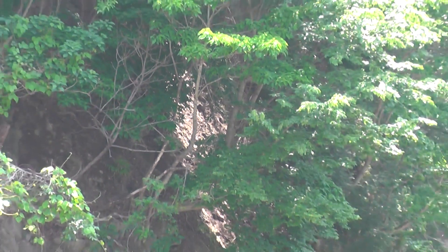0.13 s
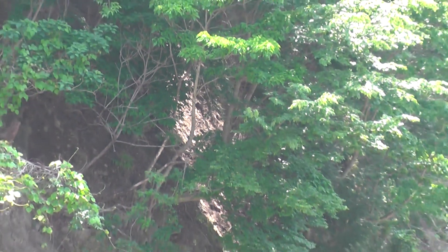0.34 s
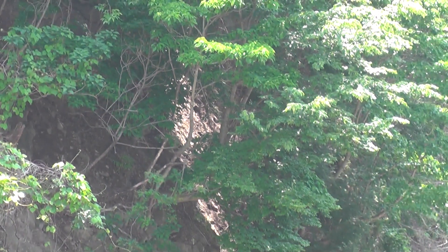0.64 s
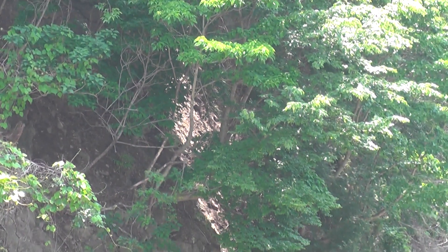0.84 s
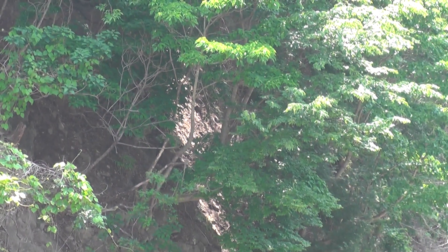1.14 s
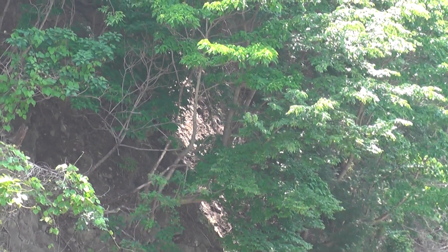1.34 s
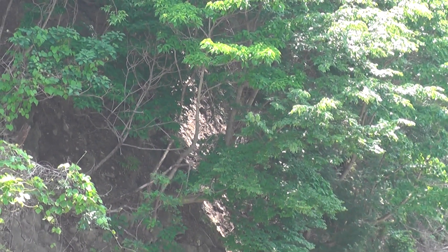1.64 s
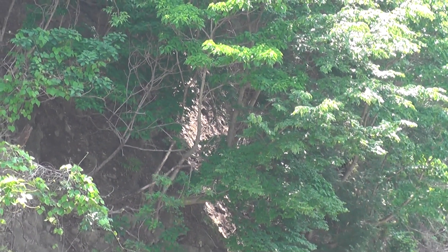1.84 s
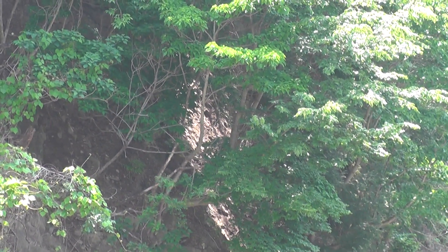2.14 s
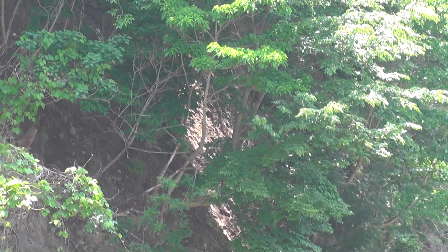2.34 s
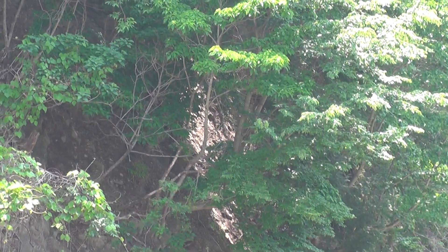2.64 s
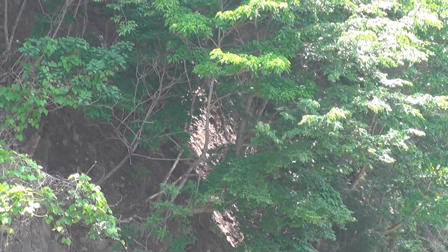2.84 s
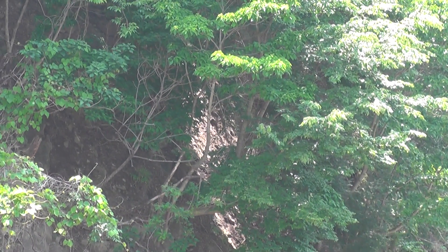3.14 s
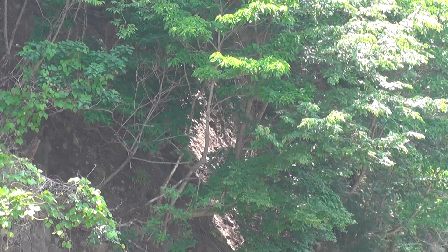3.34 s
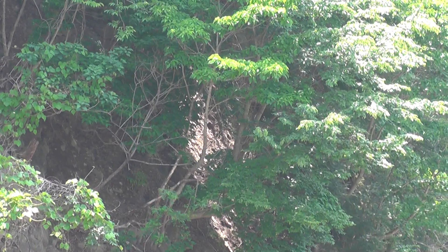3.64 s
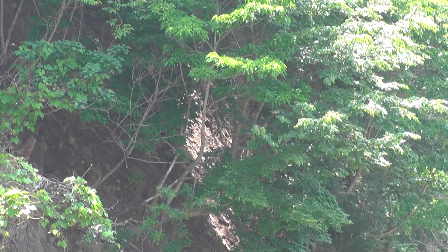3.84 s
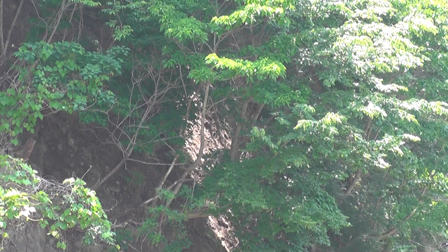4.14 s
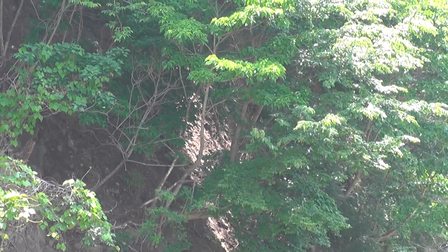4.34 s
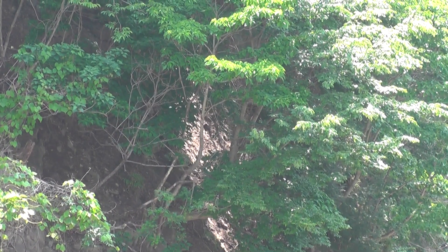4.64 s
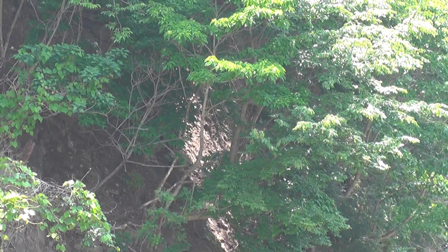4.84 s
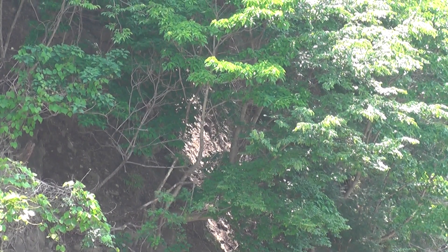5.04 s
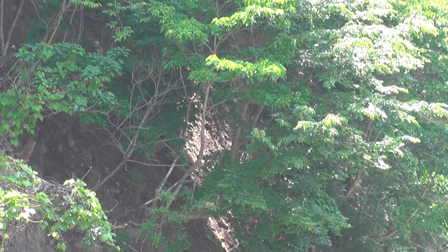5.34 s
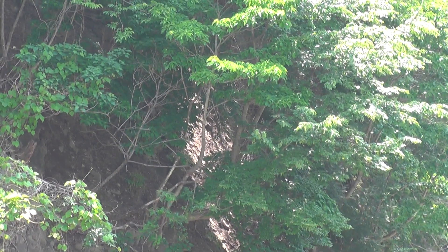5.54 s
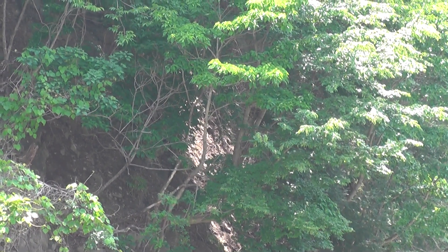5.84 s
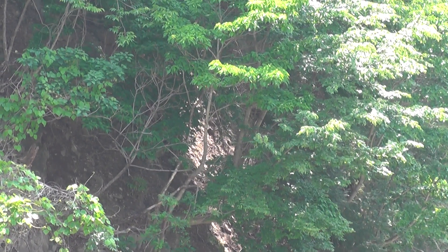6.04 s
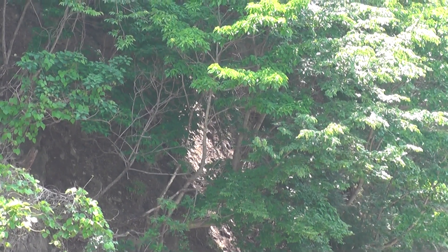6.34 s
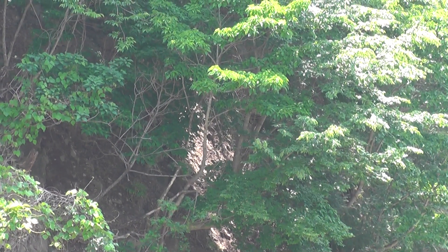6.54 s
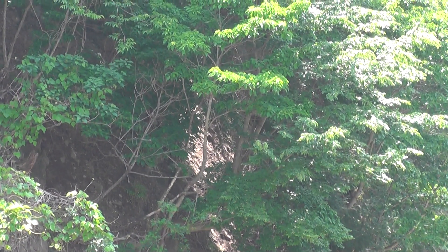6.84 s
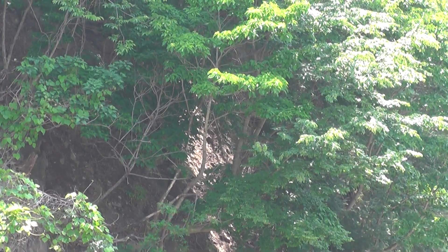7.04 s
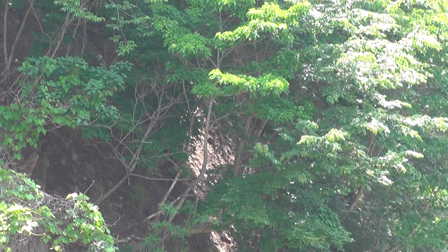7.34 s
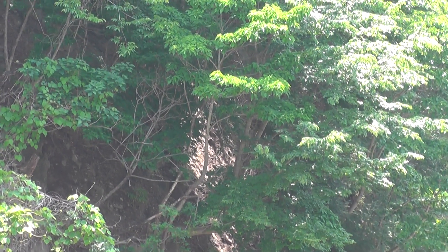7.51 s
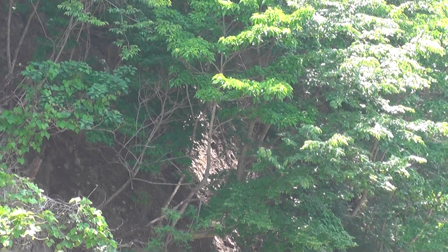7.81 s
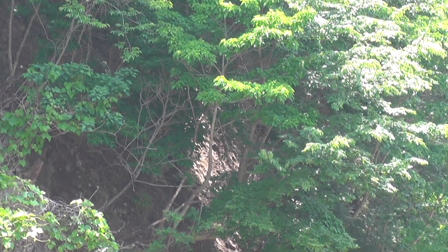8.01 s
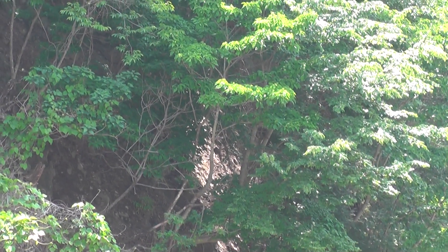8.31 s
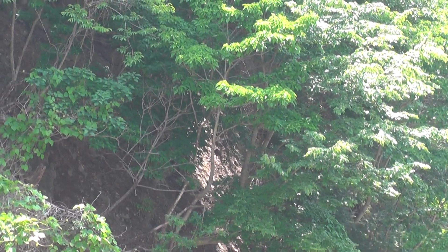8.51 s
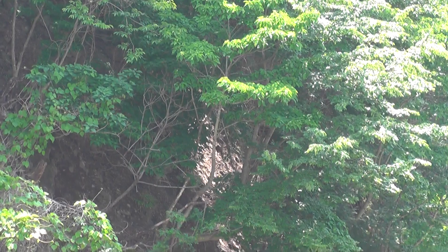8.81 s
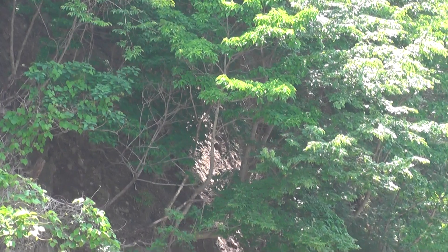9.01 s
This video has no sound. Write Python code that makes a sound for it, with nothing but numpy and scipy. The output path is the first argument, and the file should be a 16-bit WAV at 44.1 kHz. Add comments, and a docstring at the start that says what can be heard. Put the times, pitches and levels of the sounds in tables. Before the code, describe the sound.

In a wooded valley, a songbird slightly to the left sings a quick phrase of clear, high, sliding notes, then repeats it about six seconds later, echoing lightly in the trees. Far birds whistle and chirp, and one keeps giving a soft, hoarse chuck. A camera motor ticks faintly for the first second. A low rumble and soft leaf hiss continue throughout, with wind occasionally nudging the microphone.

```python
"""A small camera motor ticks for a second, ringing its housing, as wind nudges the microphone ports.
Then a songbird on the left sings a phrase of clear slurs, gliding tones that sometimes flutter into
a burr. It sings the phrase twice, and the trees of the wooded valley echo it.
Far birds whistle and chirp, and another repeats a hoarse chuck made of jittering tones.
Underneath, a low rumble swells and flickers, and far leaves hiss."""
import sys
import numpy as np
from scipy import signal
from scipy.fft import rfft, irfft, next_fast_len
from scipy.io import wavfile
from scipy.ndimage import uniform_filter1d

SR = 44100
rng = np.random.default_rng(int(sys.argv[2]) if len(sys.argv) > 2 else 0)


def file_out(sig):
    """Save sig as 16-bit WAV at sys.argv[1]."""
    # one column per channel
    cols = np.atleast_2d(sig).T
    # limit, then scale
    lim = np.clip(cols, -1, 1)
    pcm = np.round(lim * 32767).astype(np.int16)
    wavfile.write(sys.argv[1], SR, pcm)


N = 404397
TIME = np.arange(N) / SR

# The songbird's notes by name. Each row: seconds into the note, pitch in Hz, relative level in dB.
NOTE_SHAPES = { "opening": [(0.0, 6390, -40), (.012, 6210, -0.5), (.055, 6153, -8.5), (.08, 5496, -1.5),
               (.11, 4880, -7), (.14, 4500, -12), (.185, 4080, -19)], "pip": [(0.0, 7340, -41),
               (.01, 7420, -15), (.02, 7370, -2), (.028, 7355, -1.5), (.03, 7500, -13), (.037, 9700, -13)],
               "lead": [(0.0, 5270, -18), (.013, 5060, 0.5), (.035, 4700, -6)], "dip": [(0.0, 3865, 0),
               (.015, 4445, -0.5), (.03, 3830, -2), (.06, 3455, -3.5), (.095, 3197, -9)],
               "zigzag": [(0.0, 6840, -24), (.017, 7990, -1), (.026, 6670, -0.5), (.042, 7540, -2.5),
               (.052, 6790, -0.5), (.062, 6710, -5)], "rise": [(0.0, 3720, -25), (.03, 4305, -1.5),
               (.05, 4760, -2), (.07, 5000, -1.5), (.087, 3640, -20)], "high fall": [(0.0, 9700, -26),
               (.018, 8800, -14), (.036, 8190, -1), (.047, 7270, -6.5), (.056, 9080, -14)],
               "hook": [(0.0, 7400, -7), (.01, 6750, -4), (.02, 6600, 0)], "long fall": [(0.0, 6030, -25),
               (.02, 5430, 0), (.05, 4194, -6), (.08, 3445, -7)], "short fall": [(0.0, 5180, -5),
               (.012, 4340, 0.5), (.022, 4070, -6)], "tick": [(0.0, 10330, -40), (.006, 8330, 0),
               (.013, 8450, -14)], "flick": [(0.0, 6100, -14), (.007, 7200, 0.5), (.012, 9100, -7)],
               "chip": [(0.0, 6400, -12), (.009, 5890, 0.5), (.018, 5800, -12)],
               "low chip": [(0.0, 4850, -2), (.008, 5300, -1), (.014, 5500, -10)], }
# Each row: note name, start in seconds and level in dB for the first phrase, then both for the second.
PHRASE = [("opening", 1.16, -33.5, 7.711, -35), ("pip", 1.514, -27, 8.078, -26.5),
          ("lead", 1.619, -41.5, 8.179, -41), ("dip", 1.65, -42, 8.21, -41.5),
          ("zigzag", 1.786, -30.5, 8.348, -30.5), ("rise", 1.851, -39.5, 8.415, -38.5),
          ("high fall", 1.994, -32.5, 8.56, -33), ("hook", 2.068, -52, 8.634, -61),
          ("long fall", 2.099, -38.5, 8.671, -38.5), ("short fall", 2.177, -45.5, 8.75, -49.5),
          ("tick", 2.263, -37.5, 8.829, -41.5), ("flick", 2.326, -42.5, 8.888, -43),
          ("chip", 2.35, -46.5, 8.909, -42), ("low chip", 2.363, -50, 8.924, -47),
          ("flick", 2.415, -44.5, 8.975, -41.5), ("chip", 2.438, -47, 8.995, -44),
          ("low chip", 2.453, -50, 9.01, -48)]
# Each row: harmonic number, its tone curve as pairs of frequency in Hz and dB against the fundamental.
OVERTONES = [(2, [(6500, -34), (9500, -15.5), (12500, -26), (15000, -37)]), (3, [(9500, -26), (12500, -16),
             (15000, -23)])]
# A double push opens the second phrase. Each row: time in seconds, gain in dB, pitch rise as a fraction.
ACCENT = [(7.714, -10, 0.017), (7.731, 10.5, .014), (7.742, 4, .014), (7.752, 11, .014),
          (7.758, -4, 0.0104), (7.775, 1, 0)]
# Each row: frequency in Hz, left minus right in dB.
SONGBIRD_PAN = [(3500, 7), (6000, 6), (7400, 2), (8500, -1.5), (13000, -3.5)]
LEFT_LEAD_US = 24   # the left port is nearer
BURR_THROB = 9   # level swing per unit of pitch swing


def songbird():
    """The near bird whistles its phrase; the housing shades the right port, less so in the treble."""
    voice, flutter = np.zeros(N), burr()
    times, push_db, sharpen = np.transpose(ACCENT)
    push = from_db(np.interp(TIME, times, push_db, left=0, right=0))
    bend = np.interp(TIME, times, sharpen, left=0, right=0)
    wobble = 0.0031 * drift(120) + flutter + bend
    throb = (1 + BURR_THROB * np.roll(flutter, shift=8)) * push
    for name, start, level_db in sung_notes():
        add_note(voice, np.array(NOTE_SHAPES[name]) + [start, 0, level_db], wobble, throb, OVERTONES)
    size = next_fast_len(N, real=True)
    hz = np.arange(size // 2 + 1) * SR / size + 1
    # Each side takes half of the pan and half of the lead.
    to_left = from_db(at_hz(SONGBIRD_PAN, hz) / 2) * np.exp(1j * np.pi * hz * LEFT_LEAD_US / 1e6)
    stereo = irfft(rfft(voice, size) * [to_left, 1 / to_left], size)[:, :N] * from_db(0.5)
    return stereo + forest_echo(stereo, early_db=-3.5, tail_db=-46, mid_share=0.92)


def sung_notes():
    """The notes of both phrases as name, start and level."""
    return [(name, *cues[k:k + 2]) for k in (0, 2) for name, *cues in PHRASE]


# Each row: note name, seconds into the note where the burr opens, rms pitch swing as a fraction.
BURRS = [("opening", .058, .028), ("dip", .01, .012), ("rise", .021, .036), ("long fall", .01, .01)]
BURR_HZ, BURR_UNEVENNESS = 378, 0.3


def burr():
    """The pitch swing of a fast, uneven flutter in the voice, held until the note ends."""
    depth = np.zeros(N)
    for burred, onset, swing in BURRS:
        length = NOTE_SHAPES[burred][-1][0]
        for name, start, _ in sung_notes():
            if name == burred:
                depth += swing * np.clip((TIME - start - onset) / 0.0075, 0, 1) * (TIME < start + length)
    rate_hz = BURR_HZ * (1 + BURR_UNEVENNESS * drift(90.7))
    return depth * np.sqrt(2) * np.sin(2 * np.pi * np.cumsum(rate_hz) / SR)


# Each row: start and length in seconds, first and target pitch in Hz, settling in seconds, level in dB.
FAINT_GLIDES = [(2.52, 0.058, 6370, 6320, .02, -63), (2.533, 0.055, 5120, 4100, 0.014, -62),
                (2.61, .05, 5320, 3800, .05, -57.5), (2.83, .19, 7710, 6810, .008, -61),
                (2.858, .04, 3680, 3680, .02, -66), (2.91, 0.103, 4090, 5300, .06, -58),
                (3.048, 0.095, 4700, 5120, .012, -58), (3.07, 0.026, 7760, 6880, .008, -64),
                (3.085, .06, 4900, 3450, .018, -64), (3.239, 0.065, 6300, 5600, .03, -66),
                (3.35, .12, 8840, 8480, .015, -73), (3.49, .11, 4740, 4990, .04, -71),
                (3.639, 0.11, 4010, 3995, .05, -76), (5.26, 0.26, 5300, 5190, .03, -70),
                (5.66, 0.12, 3800, 6200, 0.22, -67), (5.829, .05, 3370, 3190, .012, -60.5),
                (6.02, .05, 4140, 3500, .08, -64.5), (6.31, 0.085, 3530, 3515, .03, -64.5),
                (6.41, .12, 3550, 3540, 0.027, -69), (6.539, .05, 3530, 3530, 0.032, -63),
                (6.6, 0.095, 4700, 4140, .014, -69), (7.08, 0.13, 5200, 4200, .012, -74),
                (7.421, .07, 4690, 3200, 0.075, -69.5), (9.1, .06, 4060, 4320, 0.013, -58)]
# A thin call, an arch and two droops, one list a note.
# Each row: seconds into the call, pitch in Hz, relative level in dB.
THIN_CALL = [
    [(0.0, 7000, -7), (.03, 7700, -3), (.07, 7900, -4), (.11, 7640, 2), (.125, 7150, -3)],
    [(.195, 7470, -7), (.25, 7280, 1.5), (.28, 6950, 3)],
    [(.33, 7520, -1), (.36, 7620, 1.5), (.42, 6960, 2.5)],
]
# Each row: start in seconds, time stretch, pitch factor, level in dB.
THIN_CALL_CUES = [(5.49, 1.06, 0.98, -68.5), (6.76, 1.0, 1.0, -62.5)]
# A warbler's low held whistle and closing flourish, one list a note.
# Each row: time in seconds, pitch in Hz, level in dB.
WARBLER = [
    [(5.61, 1298, -80), (5.67, 1300, -71), (5.75, 1300, -82), (5.8, 1288, -70), (5.87, 1290, -69),
     (5.92, 1280, -80)],
    [(5.93, 1280, -58), (5.95, 1610, -58), (5.968, 1940, -52), (6.0, 1390, -79)],
    [(6.03, 1464, -63), (6.05, 1894, -56.5), (6.08, 1610, -75)],
    [(6.062, 2640, -71), (6.068, 3115, -48), (6.088, 2190, -50), (6.117, 2765, -51), (6.16, 1403, -60)],
    [(6.14, 2160, -57), (6.15, 2200, -55), (6.168, 3080, -52), (6.19, 2220, -55), (6.23, 2720, -58)],
]


def faint_whistles():
    """Late echoes of the songbird's phrase, then far birds; moving air and leaves make them waver."""
    voices = np.zeros(N)
    throb, wobble = from_db(1.8 * drift(40)), 0.006 * drift(100)
    whistles = [glide(*row, arch_db=9, crest=0.42) for row in FAINT_GLIDES]
    thin_notes = [np.array(note) * [stretch, transpose, 1] + [start, 0, level_db]
                  for start, stretch, transpose, level_db in THIN_CALL_CUES for note in THIN_CALL]
    for note in whistles + thin_notes + WARBLER:
        add_note(voices, note, wobble, throb)
    stereo = voices * from_db([[-4.2], [-2.2]])
    return stereo + forest_echo(stereo, early_db=-5.5, tail_db=-35.5, mid_share=0.88)


# One chuck, one list a strand. Each row: seconds from its start, pitch in Hz, relative level in dB.
CHUCK_STRANDS = [
    [(-.002, 1160, -17), (.004, 1220, -5), (.028, 1170, -14)],
    [(-.003, 2100, -19), (.003, 2480, -4), (.014, 2300, -3.5), (.026, 2030, -4), (.042, 2020, -37)],
    [(-.002, 3330, -13), (.004, 3680, -4), (.018, 3460, -1), (.03, 3360, -7.5), (.075, 3270, -9.5)],
    [(.004, 4800, -33), (.015, 4540, -21.5), (.04, 4500, -8.5)],
    [(.002, 5870, -17), (.015, 6060, -16.5), (.04, 5950, -14)],
]
# Each entry: one strand's pitch jitter as a fraction.
CHUCK_JITTER = [.012, .014, .032, .06, .02]
# Each row: start in seconds, level in dB.
CHUCK_CUES = [(0.082, -53), (0.9294, -53.5), (1.4888, -58.5), (1.833, -57), (2.6277, -51.5),
              (3.3882, -54.5), (4.0423, -56.5), (4.827, -54.5), (5.5219, -51.5), (6.2196, -54),
              (6.6854, -54), (7.1656, -62.5), (7.56, -56), (8.1916, -57.5), (9.0177, -53.5)]


def chucks():
    """A bird's short husky bark: five stacked tones, each jittering on its own."""
    voice = np.zeros(N)
    for strand, jitter in zip(CHUCK_STRANDS, CHUCK_JITTER):
        wobble, throb = jitter * drift(400), from_db(4 * drift(200))
        for start, level_db in CHUCK_CUES:
            add_note(voice, np.array(strand) + [start, 0, level_db], wobble, throb)
    stereo = voice * from_db([[-3.0], [-3.5]])
    return stereo + forest_echo(stereo, early_db=-7.5, tail_db=-45, mid_share=0.99)


# Each row: start and length in seconds, first and target pitch in Hz, settling in seconds, level in dB.
FALLING_CHIRPS = [(3.693, .075, 5900, 4560, .019, -72), (3.852, .09, 5600, 4820, .030, -69),
                  (4.057, .085, 5950, 4560, .019, -72), (4.218, .095, 5600, 4820, .030, -71),
                  (4.428, .075, 5950, 4520, .017, -73), (4.595, .09, 5450, 4850, .028, -73),
                  (4.81, .07, 5700, 4500, .019, -75), (6.315, .045, 5350, 4750, .015, -73),
                  (6.378, .03, 5300, 4300, .03, -73), (6.81, .05, 5450, 4500, .022, -71),
                  (6.945, .045, 5300, 3600, .05, -75), (7.04, .04, 4900, 3300, .05, -72),
                  (7.305, .055, 5400, 4520, .018, -72)]


def chirps():
    """A small bird in the open, dry and centred: each chirp drops fast, then eases off."""
    voice, throb = np.zeros(N), from_db(2.3 * drift(50))
    for row in FALLING_CHIRPS:
        add_note(voice, glide(*row, arch_db=10, crest=0.4), wobble=np.zeros(N), throb=throb)
    return voice * from_db(-1.5)


# The tail, band by band. Each row: a label in Hz, seconds to fall 60 dB, relative level in dB.
TREE_TAIL = [(2000, 1.1, 5), (3800, 1.33, 5.5), (5500, 1, 7), (7500, 0.94, 3.5), (12000, 1.22, 2.5)]
TAIL_EDGES_HZ = (300, 3000, 4600, 6600, 9000, 19000)
# First reflections. Each row: delay in seconds, relative level in dB.
BRANCH_ECHOES = [(.0042, -15), (.008, -4), (.015, -11.5)]
SLOPE_DELAY_S, SLOPE_SPREAD_S, SLOPE_DB = 0.249, 0.0045, -41


def forest_echo(sound, early_db, tail_db, mid_share):
    """Echoes alone: near branches, a dense tail from the trees and one late slap off a wooded slope."""
    t = np.arange(round(1.5 * SR)) / SR
    mid, side = rng.standard_normal((2, len(t)))
    scatter = np.sqrt(mid_share) * mid + np.sqrt(1 - mid_share) * side * [[1], [-1]]
    tail, build_up = 0, 1 - np.exp(-t / 0.004)
    for low, high, (_, t60, band_db) in zip(TAIL_EDGES_HZ, TAIL_EDGES_HZ[1:], TREE_TAIL):
        decay = from_db(tail_db + band_db - 60 * t / t60)
        tail += filtered(scatter, 2, [low, high], "band") * decay * build_up
    slope = scatter * from_db(SLOPE_DB) * np.exp(-0.5 * ((t - SLOPE_DELAY_S) / SLOPE_SPREAD_S) ** 2)
    twigs = scatter * from_db(-23 - 60 * t / 0.096)
    reflections = slope + twigs
    for delay, level_db in BRANCH_ECHOES:
        reflections[:, round(delay * SR)] += from_db(level_db)
    reflections = filtered(reflections, 1, 9000, "low")   # bark and leaves dull the treble
    return signal.fftconvolve(sound, tail + from_db(early_db) * reflections, axes=1)[:, :N]


# The motor's fade. Each row: time in seconds, strength of the steps in dB.
MOTOR_FADE = [(0, -52), (.5, -53.5), (.95, -54), (1.119, -66), (1.2, -89)]
MOTOR_START_S, TICKS_PER_S = 0.0175, 59.75


def camera_motor():
    """Evenly spaced motor steps of uneven strength ring the housing."""
    at = np.round(np.arange(MOTOR_START_S, MOTOR_FADE[-1][0], 1 / TICKS_PER_S) * SR).astype(int)
    steps = np.zeros(N)
    steps[at] = from_db(automation(MOTOR_FADE)[at] + rng.normal(0, 2.5, len(at)))
    return filtered(ring(steps, hz=1700, t60=0.0094), 1, [1300, 2100], "band")


# Each row: resonance in Hz, level in dB, seconds to fall 60 dB.
HOUSING_MODES = [(780, -39.5, 0.012), (1130, -40, 0.0084), (1600, -45, 0.0092), (2360, -44, 0.0099),
                 (3600, -48, .006), (6030, -53, 0.0042), (10800, -48, 0.0033)]
TAP_S = 0.5062


def housing_tap():
    """One tap sets the housing's resonances ringing briefly."""
    tap = np.zeros(N)
    tap[round(TAP_S * SR)] = 1
    return sum(from_db(level_db) * ring(tap, hz, t60) for hz, level_db, t60 in HOUSING_MODES)


# Each row: time of the crest in seconds, half width in seconds, level in dB.
GUSTS = [(.02, 0.035, -54), (.14, .03, -55), (.69, .08, -69), (4.87, .04, -53), (5.3, .05, -69),
         (5.67, .07, -63), (8.19, .035, -47.5), (8.45, 0.034, -58)]
BREEZE_DB = -71


def wind():
    """Lumpy pressure on each port, mostly its own, stronger on the left."""
    noise = rng.standard_normal((3, N))
    shared, left, right = filtered(filtered(noise, 1, 60, "high"), 3, 95, "low")
    pressure = rms_one(np.array([0.6 * shared + left, 0.31 * shared + right]))
    gusts = sum(from_db(db) * np.exp(-((TIME - crest) / width) ** 2) for crest, width, db in GUSTS)
    return (from_db(BREEZE_DB) + gusts) * pressure * from_db([[1.5], [-1.5]])


# The rumble's tone curve. Each row: frequency in Hz, relative level in dB.
RUMBLE_COLOUR = [(24, -47), (40, -23.5), (97, -9.5), (135, -1.5), (168, 3), (237, -6.5), (305, 1),
                 (385, -11), (455, -10), (534, -21.5), (620, -31.5), (810, -54), (1360, -120)]
# Level points for the deep and the upper band. Each row: time in seconds, level in dB.
DEEP_LEVELS = [(0.0, -50), (1.99, -49), (2.27, -42.5), (2.37, -49.5), (2.45, -40.5), (2.53, -48),
               (2.96, -44), (3.55, -57), (4.01, -46.5), (4.06, -54), (4.29, -43), (4.36, -53.5), (6.1, -45),
               (6.92, -51.5), (7.61, -47), (7.89, -52), (8.86, -49), (9.17, -51)]
UPPER_LEVELS = [(0.0, -54), (2.07, -47.5), (2.12, -41.5), (2.3, -48.5), (2.96, -47), (3.57, -56.5),
                (4.26, -48), (4.47, -57.5), (5.31, -47), (5.69, -50.5), (5.77, -41), (5.98, -50),
                (6.26, -46.5), (6.84, -55), (7.69, -46.5), (8.33, -55), (8.78, -48), (9.17, -54)]


def rumble():
    """Low noise in two bands, with slow swells and brief random flickers written in as level points."""
    deep = from_db(automation(DEEP_LEVELS)) * banded_noise(RUMBLE_COLOUR, 41.8, 236, flicker_db=1.12)
    upper = banded_noise(RUMBLE_COLOUR, 234.5, 603, flicker_db=1.87, per_octave=6)
    upper *= from_db(automation(UPPER_LEVELS))
    return filtered(deep + upper, 6, 573, "low")


def lingering_echo():
    """The diffuse echo of earlier calls, dying away in the trees as the scene opens."""
    start_db, t60 = -70, 5
    wash = rms_one(filtered(rng.standard_normal(N), 2, [3000, 5500], "band"))
    return wash * from_db(start_db - 60 * TIME / t60)


# The air's tone curve. Each row: frequency in Hz, relative level in dB.
AIR_COLOUR = [(290, -30), (500, 0), (561, -6.5), (1430, -19.5), (1580, -11.5), (1800, -19.5), (3490, -22.5),
              (4450, -29.5), (5850, -21.5), (6950, -28.5), (7800, -30), (9540, -26.5), (13300, -33),
              (15600, -31.5)]


def air():
    """A soft bed of far leaves and capsule hiss."""
    return from_db(-65) * banded_noise(AIR_COLOUR, 500, 18000, flicker_db=1.04)


# Stereo image of the noise beds. Each row: frequency in Hz, left-right likeness (1 is mono).
BED_LIKENESS = [(60, 1), (110, 0.99), (200, 0.98), (380, 1), (700, 0.76), (1290, 0.75), (2380, 1),
                (4400, 0.92), (8120, 0.07), (15000, 0.05)]


def banded_noise(colour, low_hz, high_hz, flicker_db, per_octave=3):
    """A stereo noise bed at rms 1, each band with its own level, flicker and width."""
    edges = np.geomspace(low_hz, high_hz, round(per_octave * np.log2(high_hz / low_hz)) + 1)
    bed, white = 0, rng.standard_normal((2, 2, N))   # neighbouring bands get unrelated noise
    for k, (low, high) in enumerate(zip(edges, edges[1:])):
        mid, side = filtered(white[k % 2], 2, [low, high], "band")
        centre_hz = np.sqrt(low * high)
        likeness = at_hz(BED_LIKENESS, centre_hz)
        gain = from_db(at_hz(colour, centre_hz) + flicker_db * drift(3.08))
        bed += gain * (np.sqrt(1 + likeness) * mid + np.sqrt(1 - likeness) * side * [[1], [-1]])
    return rms_one(bed)


def add_note(track, rows, wobble, throb, overtones=()):
    """Mix in a tone gliding through rows of seconds, Hz and dB; wobble moves its pitch, throb its gain."""
    times, hz, db = np.transpose(rows)
    span = np.arange(max(round(times[0] * SR), 0), min(round(times[-1] * SR), N))
    pitch = uniform_filter1d(np.interp(span / SR, times, hz), size=120, mode="nearest")   # round bends
    phase = 2 * np.pi * np.cumsum(pitch * (1 + wobble[span])) / SR
    tone = np.sin(phase)
    for k, colour in overtones:
        tone += from_db(at_hz(colour, k * pitch)) * np.sin(k * phase) * (k * pitch < 0.45 * SR)
    soft_ends = np.clip(np.minimum(span - span[0], span[-1] - span) / 150, 0, 1)
    track[span] += soft_ends * np.interp(span / SR, times, from_db(db)) * throb[span] * tone


def glide(start, length, from_hz, to_hz, settle, level_db, arch_db, crest):
    """Rows of a settling slur, loudest at the fraction crest, arch_db down half a length from there."""
    t = np.linspace(0, length, num=12)
    pitch = to_hz + (from_hz - to_hz) * np.exp(-t / settle)
    swell_db = level_db - arch_db * (2 * (t / length - crest)) ** 2
    return np.transpose([start + t, pitch, swell_db])


def ring(clicks, hz, t60):
    """A unit click sets a sine of height 1 ringing."""
    decay, angle = from_db(-60 / (t60 * SR)), 2 * np.pi * hz / SR
    return signal.lfilter([0, np.sin(angle)], [1, -2 * decay * np.cos(angle), decay ** 2], clicks + 1e-18)


def drift(rate_hz):
    """A smooth random wander with a spread of 1."""
    hop = 40
    pole = np.exp(-2 * np.pi * hop * rate_hz / SR)
    slow = signal.lfilter([1], [1, -2 * pole, pole ** 2], rng.standard_normal(N // hop + 2002))[2000:]
    return np.interp(np.arange(N) / hop, np.arange(len(slow)), rms_one(slow))


def filtered(sound, order, hz, kind):
    """A low, high or band pass."""
    return signal.sosfilt(signal.butter(order, hz, kind, fs=SR, output="sos"), sound)


def automation(rows):
    """A curve of seconds and values, read at every sample."""
    return np.interp(TIME, *np.transpose(rows))


def at_hz(rows, hz):
    """Read a curve on a log-frequency axis."""
    frequencies, values = np.transpose(rows)
    return np.interp(np.log(hz), np.log(frequencies), values)


def from_db(db):
    """Decibels to gain."""
    return 10 ** (np.asarray(db) / 20)


def rms_one(sound):
    """Scale to rms 1."""
    return sound / np.sqrt(np.mean(sound ** 2) + 1e-20)


def scene():
    """Birds and their echoes, with the camera's small noises, over air, wind and rumble."""
    bed = air()
    birds = songbird() + faint_whistles() + chirps() + chucks()
    return birds + camera_motor() + housing_tap() + wind() + rumble() + lingering_echo() + bed


def record(dry):
    """The sound ports partly cancel a narrow band, then the top is cut steeply."""
    notch_hz, width_hz, depth, cutoff_hz = 7810, 880, 0.48, 15800
    band = signal.lfilter(*signal.iirpeak(notch_hz, notch_hz / width_hz, fs=SR), dry)
    return signal.sosfilt(signal.cheby2(24, 70, cutoff_hz, fs=SR, output="sos"), dry - depth * band)


dry = scene()
out = record(dry)
file_out(out)
```